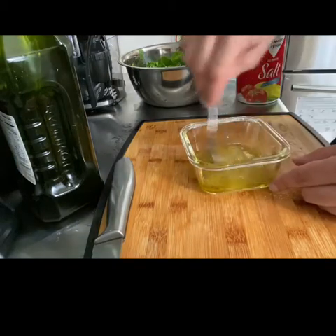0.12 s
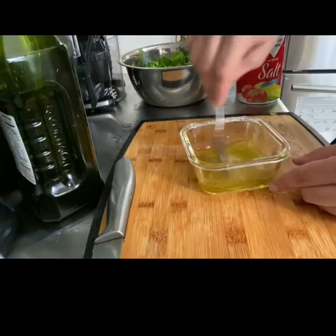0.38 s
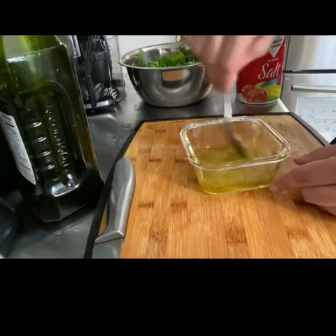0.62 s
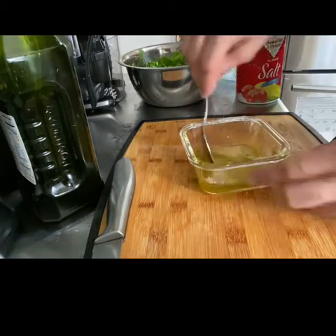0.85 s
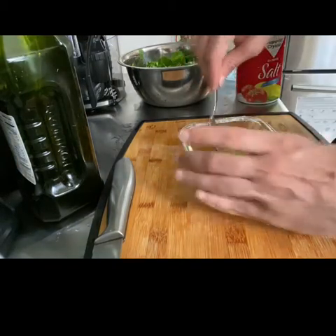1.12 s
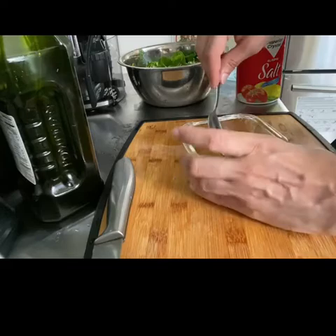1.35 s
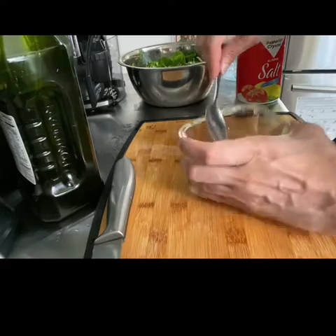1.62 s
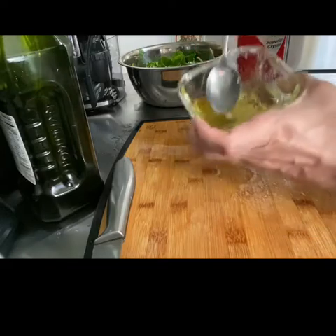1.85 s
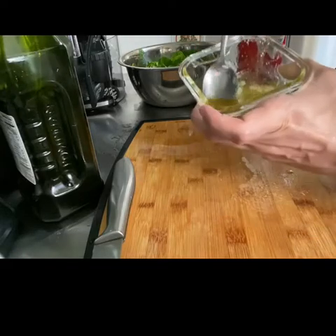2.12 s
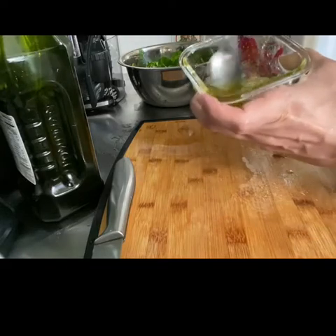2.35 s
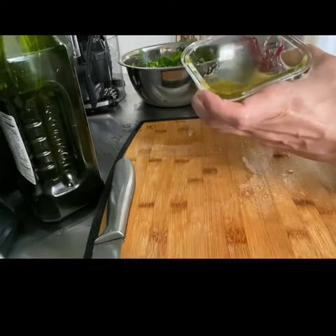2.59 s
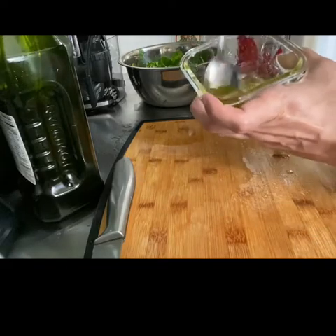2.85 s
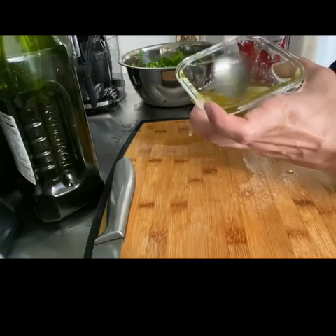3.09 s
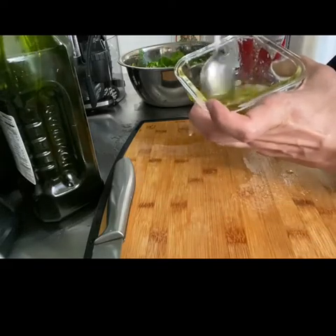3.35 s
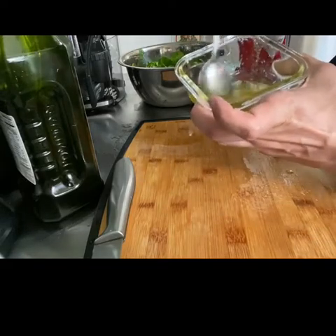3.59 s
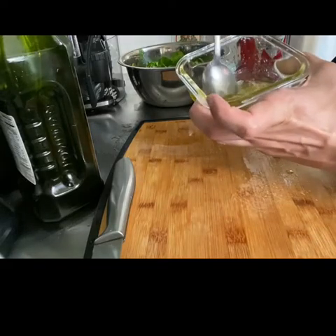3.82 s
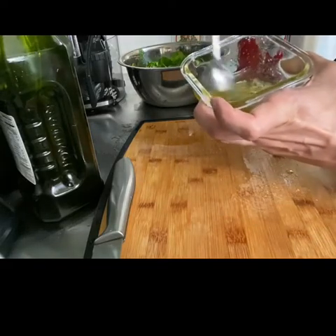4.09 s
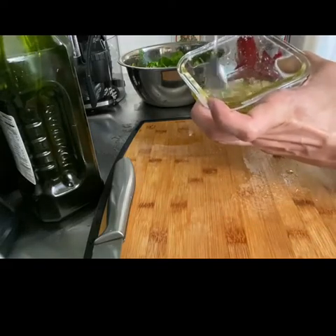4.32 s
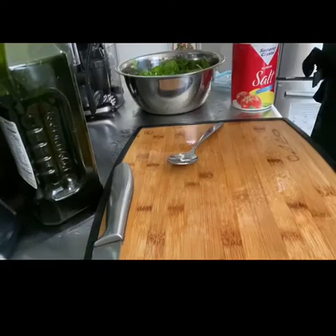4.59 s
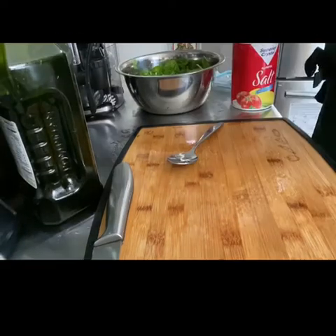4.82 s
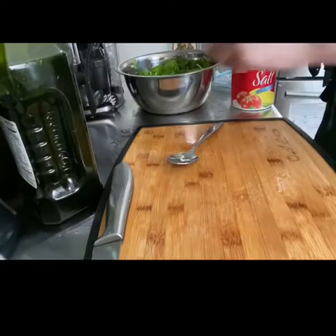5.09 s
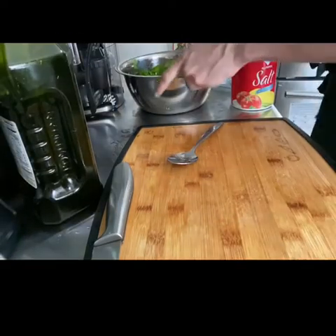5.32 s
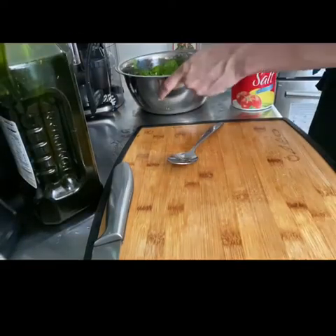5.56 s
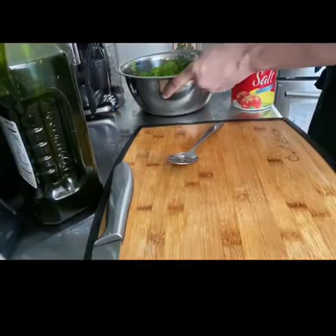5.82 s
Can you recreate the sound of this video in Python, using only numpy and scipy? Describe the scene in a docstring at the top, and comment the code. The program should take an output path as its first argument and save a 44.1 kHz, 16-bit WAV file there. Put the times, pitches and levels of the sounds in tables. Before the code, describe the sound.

Bright ringing spoon-on-glass clinks, wet stirring and sparse sharper knocks over a low kitchen drone, ending with soft thumps on a metal bowl.

```python
"""In a kitchen, a steel spoon stirs oily dressing in a small glass dish; after a dip in level, fingers tap a salad bowl.
Clinks are noise cracks with decaying glass modes; stirring and scraping are friction noise through resonances.
Bubbles are decaying sines of rising pitch, the dragged dish hums as a sine, and the taps are falling sines with clicks.
A hand lifts the dish and damps it. Shaped noise drones behind and is quieter after the dip."""
import sys
import numpy as np
from scipy import signal
from scipy.fft import rfft, irfft, next_fast_len
from scipy.io import wavfile
from scipy.ndimage import uniform_filter1d, map_coordinates

SR = 44100
rng = np.random.default_rng(int(sys.argv[2]) if len(sys.argv) > 2 else 0)


def generate_wav(signal):
    """Clip the signal to [-1, 1] and save it as 16-bit WAV at the path in sys.argv[1]."""
    frames = np.transpose(np.atleast_2d(signal))
    scaled = np.clip(frames, -1, 1) * 32767
    pcm = np.round(scaled).astype(np.int16)
    wavfile.write(sys.argv[1], SR, pcm)


def volts_from_db(level):
    """Convert decibel levels to linear amplitude ratios."""
    exponent = np.asarray(level, float) / 20
    return 10 ** exponent


N = 261954
CHANGE_S = 4.527  # the kitchen turns quieter, at the bottom of the dip
STIR_FROM_S, STIR_TO_S = 2.12, 4.5  # span of the chance touches and chance bubbles

# Louder kitchen spectrum. Each row: frequency in Hz, gain in dB.
DRONE_SPECTRUM = [(40, -7.5), (63, -7), (192, -5), (260, -9), (400, -10.5), (510, -13), (1010, -17.5),
                  (1390, -24.5), (3000, -33), (7900, -42.5), (9000, -42), (12200, -45.5), (14000, -51),
                  (15000, -72)]
# Quieter kitchen spectrum. Each row: frequency in Hz, gain in dB.
QUIET_SPECTRUM = [(43, -5), (87, -4.5), (135, -14), (280, -16), (500, -23), (1600, -30.5), (3500, -44),
                  (6400, -51), (9200, -47.5), (10300, -61.5), (11800, -41.5), (14300, -42.5),
                  (15300, -62.5)]
# Room resonances in the drone. Each row: frequency in Hz, width in Hz, height in dB re the flat base.
ROOM_MODES = [(58.3, 8.2, 13), (100, 4.9, 7), (148, 3, 4), (191.2, 11, 10.5), (235.6, 8.9, 8)]
# Course of the louder kitchen. Each row: time in seconds, level in dB.
DRONE_LEVEL = [(0, -43), (.19, -48.5), (.5, -47.5), (1.4, -45.5), (1.8, -46.5), (3.2, -47), (4.49, -45.8)]
# Course of the quieter kitchen. Each row: time in seconds, level in dB.
QUIET_LEVEL = [(4.6, -56), (5.94, -53)]
# Left-right likeness of the kitchen. Each row: frequency in Hz, correlation from -1 to 1.
LIKENESS = [(60, 0.94), (180, 0.89), (550, 0.06), (1650, 0.14), (4970, 0.38), (15000, -0.35)]
# Band thinned out of the drone, ringing, friction, bubbles and room tail. Each row: frequency in Hz, gain in dB.
GAP = [(9000, -2), (9500, -30), (10900, -30.5), (11300, -3)]
# Strokes of the spoon through the dressing.
# Each row: middle in seconds, length in seconds, then mid-stroke levels in dB: 4.3 kHz ring, 3 kHz ring, swish.
STROKES = [(.06, 0.11, -69.5, -67, -62), (0.189, 0.0371, -40, -58.5, -69), (2.186, 0.12, -62.5, -65, -68),
           (2.31, .1, -64.5, -58.5, -62.5), (2.436, 0.03, -51.5, -74, -62), (2.503, .08, -62, -67, -66),
           (2.651, .1, -61, -74, -61), (2.785, 0.037, -74, -61, -78), (2.908, 0.095, -58.5, -69, -59),
           (3.198, 0.078, -56.5, -74, -60), (3.45, .1, -62.5, -73, -66), (3.724, .1, -58.5, -63, -59),
           (3.813, 0.07, -70, -70, -61), (3.926, .14, -66, -71, -63), (4.16, .14, -56, -60, -55),
           (4.404, 0.029, -80, -57, -84), (4.497, 0.029, -51.5, -81, -85)]
# Spectrum of the wet swish. Each row: frequency in Hz, gain in dB.
SWISH_SPECTRUM = [(900, -29), (1500, -4.5), (3000, -7.5), (6100, -4.5), (8500, -1), (12000, -6),
                  (15000, -21)]
# Bubbles in the dressing.
# Each row: start in seconds, level in dB, starting pitch in Hz, t60 in seconds, pitch rise as a share.
BUBBLES = [(0.092, -20, 960, 0.063, 0.23), (0.109, -35, 1363, 0.073, 0.054), (.31, -47, 1351, .1, 0.035),
           (.345, -44.5, 1350, 0.11, 0.038), (2.275, -47.5, 1200, 0.093, .05),
           (2.628, -47, 1420, 0.049, 0.049), (3.358, -49, 1232, 0.028, .05),
           (4.291, -31.5, 1250, 0.036, .03), (4.4, -38.5, 1030, 0.094, 0.31),
           (4.413, -32.5, 1255, 0.055, 0.048)]
# Spoon on glass. Each row: start in seconds, blow level in dB, treble tilt in dB,
# ring in dB re the blow, ring tilt near 3 kHz in dB.
CLINKS = [(0.0922, -33, -5.5, -39.5, 5), (0.192, -5, -2, -34, -8.5), (0.2158, -28, -6.5, -34.5, -7),
          (0.5145, -8, -4.5, -34, -11), (0.5494, -33, -1, -26.5, -5.5), (0.8696, -6, 1.5, -32, -4),
          (1.0712, -9.5, 0.5, -36, -13.5), (2.0547, -22.5, -3.5, -37, 5.5), (2.1871, -52, -15, -24, -2.5),
          (2.2403, -54, -2.5, -30, 9), (2.319, -55, -2, -32, 6.5), (2.96, -49, -8, -34, 10.5),
          (2.2707, -47.5, -7, -37, 2), (2.3979, -49.5, -7, -32.5, -1), (2.5569, -45.5, 1.5, -36, 18),
          (2.6785, -54.5, 8, -43, -4.5), (2.9181, -45, -1, -51, -3), (3.0628, -45.5, -8.5, -35.5, 8),
          (3.18, -51, -1, -27, -10), (3.3164, -52.5, 0, -40, 8), (3.5199, -43, -2.5, -38.5, 8),
          (3.5886, -13, 4, -44, 10), (3.6283, -21.5, -3.5, -31, 2.5), (3.8099, -48, -4, -37.5, 1.5),
          (4.0103, -40, 3, -40, 17), (4.0413, -10, 2.1, -44.5, 11), (4.1874, -48.5, -11, -26, -5),
          (4.2958, -32, 0, -36.5, 17.5)]
# Firmness of the hand on the dish. Each row: time in seconds, grip from 0 to 1.
GRIP = [(0, 0.15), (.8, 0.12), (1.0, 0.77), (1.07, 0.35), (1.6, 0.8), (6, 0.58)]
# Higher modes of dish and spoon.
# Each row: frequency in Hz, relative level in dB, t60 in seconds without grip, blurred power share from 0 to 1.
GLASS_MODES = [(1340, -14, .08, .3), (1750, -12, .06, .3), (2780, -14, .1, .5), (3020, -8, .14, .5),
               (3115, -8, .2, .4), (3790, -13, .2, .5), (4075, -7, .5, .6), (4200, -1, .62, .55),
               (4255, -4, .62, .7), (4420, -6, .55, .7), (4545, -12, .3, .7), (5200, -14, .13, .6),
               (5900, -8, .5, .8), (6013, -1, .5, .65), (6490, -13, .2, .6), (6850, -12, .3, .5),
               (7580, -2, .6, .15), (12150, -18, .2, .5), (13300, -16, .15, .5), (14050, -16, .08, .5)]
# Spectrum of the crack before the tilt of each blow. Each row: frequency in Hz, gain in dB.
CRACK_SPECTRUM = [(300, -27.5), (700, -22.5), (1800, -13.5), (2500, -20), (4200, -15.5), (6000, -9),
                  (8000, -20), (10300, -18), (12800, -17.5), (14500, -33.5), (16500, -54)]
# Lowest wall mode after hard blows. Each row: start in seconds, quick level in dB, quick t60 in seconds,
# quick pitch above its twin in Hz, twin pitch in Hz, twin level in dB, twin t60 in seconds.
WALL_MODE = [(.192, -2, .115, .65, 2385, -19, .6), (.515, -.7, .184, 2.75, 2385, -13.3, .56),
             (.871, -3.8, .147, 15.6, 2385, -16.7, .28), (1.072, -11.5, .1, -20, 2475, -35, .46),
             (3.589, -23, .09, 48, 2345, -33, .33), (4.042, -21.5, .12, 12.3, 2352, -31, .45)]
# Hum of the dish dragged on the board. Each row: time in seconds, pitch in Hz, rms level in dB.
SLIDE = [(1.4, 146, -55), (1.45, 148.5, -46), (1.562, 147.5, -47.5), (1.64, 145, -62)]
# Dry slips up the wall. Each row: time of the peak in seconds, peak level in dB.
SLIPS = [(1.637, -53), (1.697, -34)]
# Spectrum of dry friction. Each row: frequency in Hz, gain in dB.
RUB_SPECTRUM = [(530, -49.5), (900, -20), (1230, 4), (2390, -0.5), (3230, -6.5), (4630, -11.5), (5550, -5),
                (7770, -14.5), (8350, -25), (9420, -72), (11700, -6.5), (14000, -27), (16000, -99)]
# Glass resonances under friction. Each row: frequency in Hz, width in Hz, height in dB re the flat base.
RUBBED_MODES = [(2420, 69, 16), (4670, 330, 17.5), (6100, 150, 5), (8060, 310, 18), (12350, 200, 9.5),
                (13500, 200, 7)]
# Fingers on the bowl. Each row: start in seconds, overall gain in dB, click in dB re that gain, final pitch in Hz.
TAPS = [(4.814, -61, 2, 108.5), (5.442, -37, -7, 105), (5.609, -34.5, -9.5, 102), (5.716, -36, -11, 107.8),
        (5.777, -34.5, -22, 105), (5.888, -30.5, -9.5, 112.2)]
# Tiny dry ticks. Each row: start in seconds, level in dB, pitch in Hz.
TICKS = [(4.9794, -54, 7040), (5.0576, -46, 7660)]
# Decay of the room. Each row: frequency in Hz, t60 in seconds.
ROOM_DECAY = [(300, .3), (2000, 0.16), (6000, 0.25), (9000, 0.047), (13000, 0.067)]
# Phase of near sources. Each row: frequency in Hz, lead of the left port in radians.
PORT_LEAD = [(0, 0.5), (2500, -1), (3360, 2.09), (5170, -2.5), (6290, -6.5), (14100, -11.5), (14800, -11),
             (16400, -24)]
# Gain of the whole mix, with one brief dip. Each row: time in seconds, gain in dB.
FADE = [(0, 1), (4.495, 1.5), (4.527, -23), (4.575, 2), (6, -1)]


def unit(x):
    """Normalization: scaled to rms 1."""
    return x / np.sqrt(np.mean(x ** 2) + 1e-20)


def along(points, hz):
    """Interpolation of (Hz, value) points on a logarithmic frequency axis."""
    f, v = np.transpose(points)
    return np.interp(np.log(hz + 1), np.log(f + 1), v)


def curves(rows):
    """Linear interpolation: a curve for each column, and a gate open inside the table's time."""
    s, *cols = np.transpose(rows)
    t = np.arange(N) / SR
    gate = uniform_filter1d(1. * (t >= s[0]) * (t <= s[-1]), size=40)
    return [np.interp(t, s, c) for c in cols] + [gate]


def wobble(rate):
    """Slow random modulation: a smooth curve with rate knots a second."""
    knots = rng.standard_normal(int(N * rate / SR) + 4)
    return map_coordinates(knots, [np.arange(N) * rate / SR])


def filtered(x, response):
    """Linear filtering: the spectrum times a complex response of frequency."""
    m = next_fast_len(x.shape[-1] + 8192)
    return irfft(rfft(x, m) * response(np.fft.rfftfreq(m, 1 / SR)), m)[..., :x.shape[-1]]


def peaks(modes, hz):
    """Resonance: Lorentzian power peaks standing on a flat base."""
    return np.sqrt(1 + sum(volts_from_db(db) ** 2 / (1 + (2 * (hz - c) / w) ** 2) for c, w, db in modes))


def add(track, s, sound):
    """Superposition: mix a sound in at a time in seconds."""
    part = track[round(s * SR):][:len(sound)]
    part += sound[:len(part)]


def rush(gain, patchy_db):
    """Partly coherent noise with random patches in time and frequency; the mid's 40-1200 Hz sets the scale."""
    z = signal.stft(rng.standard_normal((2, N)), nperseg=2048)[2]
    field = uniform_filter1d(rng.standard_normal(z.shape[1:]), size=2, axis=0)
    field = uniform_filter1d(field, size=5, axis=1)
    pair = signal.istft(z * volts_from_db(patchy_db * unit(field)), nperseg=2048)[1][:, :N]

    def mid_side_gain(hz):
        """Correlation as the cosine of an angle, split between mid and side."""
        half_angle = np.arccos(np.clip(along(LIKENESS, hz), -1, 1)) / 2
        return gain(hz) * [np.cos(half_angle), np.sin(half_angle)]

    mid, side = filtered(pair, mid_side_gain)
    body = filtered(mid, lambda hz: (hz > 40) * (hz < 1200))
    return np.array([mid + side, mid - side]) / np.std(body)


def kitchen():
    """Room resonance: far machines drone in the room's modes; later only a softer rumble and hiss."""
    drone = rush(lambda hz: volts_from_db(along(DRONE_SPECTRUM, hz) + along(GAP, hz)) * peaks(ROOM_MODES, hz), patchy_db=3.0)
    quiet = rush(lambda hz: volts_from_db(along(QUIET_SPECTRUM, hz)), patchy_db=1.5)
    drone = volts_from_db(curves(DRONE_LEVEL)[0]) * drone
    quiet = volts_from_db(curves(QUIET_LEVEL)[0]) * quiet
    early = np.arange(N) < CHANGE_S * SR
    return volts_from_db(0.44 * wobble(3)) * np.where(early, drone, quiet)


def stirring():
    """Wet friction: a grainy swish, and glass resonances that flicker on their own."""
    def flicker(rate):
        return volts_from_db(2.5 * wobble(rate)) * rng.standard_normal(N)

    def band(center_hz, width_hz):
        return unit(filtered(flicker(60), lambda hz: 1 / (1 + (2 * (hz - center_hz) / width_hz) ** 2)))

    # on average 400 grains a second, of widely spread strength
    grains = (rng.random(N) < 400 / SR) * volts_from_db(5 * rng.standard_normal(N))
    swish = unit(filtered(flicker(44) + 9 * grains, lambda hz: volts_from_db(along(SWISH_SPECTRUM, hz))))
    swish = swish + 0.223 * band(6350, 280)
    upper, lower = band(4320, 360), band(3060, 300)
    t = np.arange(N) / SR
    levels = np.zeros((3, N))
    for s, length, *db in STROKES:
        # 13 dB down at both ends of the stroke, and on falling beyond
        levels += volts_from_db(np.array(db)[:, None] - 13 * np.abs(2 * (t - s) / length))
    return np.sum(levels * [upper, lower, swish], axis=0)


def chance_bubbles():
    """Random nucleation: rows like BUBBLES for tiny ones while the lifted dish is stirred."""
    count = 90
    when = rng.uniform(STIR_FROM_S, STIR_TO_S, count)
    size, tune = rng.standard_normal((2, count))
    # levels spread by 4 dB, pitches by 0.6 octave
    return [(s, -59 + 4 * a, 2592 * 2 ** (0.6 * b), .03, .04) for s, a, b in zip(when, size, tune)]


def bubbles():
    """Bubble resonance: a damped sine with a soft start and a rising pitch."""
    out, t = np.zeros(N), np.arange(SR // 5) / SR
    for s, db, hz, t60, rise in BUBBLES + chance_bubbles():
        pitch = hz * (1 + rise * (1 - np.exp(-t / 0.02)))
        envelope = volts_from_db(db - 60 * t / t60) * (1 - np.exp(-t / 0.003))
        add(out, s, envelope * np.sin(2 * np.pi * np.cumsum(pitch) / SR))
    return out


def grip_at(s):
    """Damping by the hand: its firmness from 0 to 1 at a time in seconds."""
    return np.clip(np.interp(s, *np.transpose(GRIP)), 0, 1)


def shimmer(count, t, rate):
    """Random modulation: one complex wobble of rms 1 for each mode, rate knots a second."""
    knots = rng.standard_normal((2, count, int(t[-1] * rate) + 2))
    k, part = (t * rate).astype(int), t * rate % 1
    smooth = knots[..., k] * (1 - part) + knots[..., k + 1] * part
    return unit(smooth[0]) / np.sqrt(2) + 1j * unit(smooth[1]) / np.sqrt(2)


def touches():
    """Chance contact: rows like CLINKS for faint touches while the lifted dish is stirred."""
    count = 14
    when = rng.uniform(STIR_FROM_S, STIR_TO_S, count)
    size, third = rng.standard_normal((2, count))
    return [(s, -55 + 2.5 * a, -9, -27, 6 * b) for s, a, b in zip(when, size, third)]


def clinks():
    """Impact excitation: a crack, a hiss of dense small modes, clear modes, and the board's thud under a standing dish."""
    sharp, ringing, t = np.zeros(N), np.zeros(N), np.arange(SR // 2) / SR
    mode_hz, mode_db, t60, blur = np.transpose(GLASS_MODES)[:, :, None]
    waves = np.exp(2j * np.pi * mode_hz * t)
    for s, db, treble_db, ring_db, third_db in CLINKS + touches():
        grip = grip_at(s)
        knock_db = 2.6 - 6 * grip  # a firm hand weakens the low knock
        top_db = -1.1 + 1.5 * min(treble_db, 2)  # the top swings more than the treble
        tilt_points = [(1000, knock_db - 2.5), (1800, knock_db), (2400, 0.01), (3050, third_db), (3900, 0),
                       (4600, 0), (6500, treble_db - 4.0), (8500, treble_db + 2.5), (11500, top_db)]
        tilt = lambda hz: volts_from_db(along(tilt_points, hz))

        noise = unit(filtered(rng.standard_normal(len(t)), lambda hz: tilt(hz) * volts_from_db(along(CRACK_SPECTRUM, hz))))
        crack = volts_from_db(-60 * t / (.011 + .012 * grip)) * (1 - np.exp(-t / .0007)) * noise
        hiss = filtered(noise, lambda hz: volts_from_db(along([(5000, -0.5), (8000, -3.0), (12000, -3)], hz)))
        hiss_level = volts_from_db(-33.0 + 18 * grip - 60 * t / 0.3)

        life = t60 * (1 - .9 * grip)
        # a fast first drop while the spoon still touches, then free ringing
        fall = volts_from_db(-60 * t / life) * (1 + 11.0 * volts_from_db(-60 * t / 0.069))
        # the sloshing dressing blurs each mode
        blurring = np.sqrt(1 - blur) + np.sqrt(blur) * shimmer(len(GLASS_MODES), t, rate=130)
        cluster = np.imag(waves * blurring)
        strength = tilt(mode_hz) * volts_from_db(mode_db + 0.83 * rng.standard_normal(mode_hz.shape))
        ring = np.sum(strength * fall * cluster, axis=0)

        thud = (1 - grip) ** 2 * volts_from_db(-25.5 - 60 * t / 0.077) * np.sin(2 * np.pi * 480 * t)
        add(sharp, s, volts_from_db(db) * (volts_from_db(-5.5 + 7.7 * grip) * crack + thud))
        add(ringing, s, volts_from_db(db) * (hiss_level * hiss + volts_from_db(ring_db) * ring))
    return sharp, ringing


def singing():
    """Mode splitting: a quick mode and its lasting twin in opposite phase; a firm hand spreads both."""
    out = np.zeros(N)
    stops = [row[0] for row in WALL_MODE[1:]] + [CHANGE_S]
    for (s, db, t60, split_hz, hz, twin_db, twin_t60), stop in zip(WALL_MODE, stops):
        t = np.arange(min(round((stop - s) * SR), SR // 2)) / SR
        quick = volts_from_db(db - 60 * t / t60) * np.exp(2j * np.pi * split_hz * t)
        twin = volts_from_db(twin_db - 60 * t / twin_t60)
        blur = np.clip(1.5 * grip_at(s) ** 1.8, 0, 1)
        spread = np.sqrt(1 - blur) + np.sqrt(blur) * shimmer(1, t, rate=220)[0]
        # the spoon wading towards its next blow stills the ring by 9 dB over 0.1 s
        mute = volts_from_db(-9 * np.clip(1 - (stop - s - t) / 0.1, 0, 1))
        onset = 1 - np.exp(-t / 0.0011)
        add(out, s, mute * onset * np.imag((quick - twin) * spread * np.exp(2j * np.pi * hz * t)))
    return out


def sliding():
    """Friction hum: a sine of gliding pitch as the dish is dragged on the board."""
    hz, db, gate = curves(SLIDE)
    return gate * volts_from_db(db) * np.sqrt(2) * np.sin(2 * np.pi * np.cumsum(hz) / SR)


def scraping():
    """Dry friction: gritty noise through the dish's resonances."""
    grit = volts_from_db(3.4 * wobble(68.71) + 2.5 * wobble(400)) * rng.standard_normal(N)
    t = np.arange(N) / SR
    rise_db_s, fall_db_s = 425, 400
    slips = sum(volts_from_db(db - np.maximum(rise_db_s * (s - t), fall_db_s * (t - s))) for s, db in SLIPS)
    return slips * unit(filtered(grit, lambda hz: volts_from_db(along(RUB_SPECTRUM, hz)) * peaks(RUBBED_MODES, hz)))


def tapping():
    """Dispersion: dull thumps sweep downward, since bending waves carry the highs first; two ticks besides."""
    out, t = np.zeros(N), np.arange(SR // 5) / SR
    for s, db, click_db, final_hz in TAPS:
        pitch = final_hz + 420 * np.exp(-t / 0.0043)
        thump = (1 - np.exp(-t / 0.0093)) * volts_from_db(5.5 - 60 * t / .1) * np.sin(2 * np.pi * np.cumsum(pitch) / SR)
        noise = unit(filtered(rng.standard_normal(len(t)), lambda hz: 1 / (1 + (hz / 900) ** 4)))
        click = volts_from_db(click_db - 60 * t / 0.018) * (1 - np.exp(-(t / 0.00056) ** 2)) * noise
        add(out, s, volts_from_db(db) * (thump + click))
    for s, db, hz in TICKS:
        add(out, s, volts_from_db(db - 60 * t / 0.0023) * np.sin(2 * np.pi * hz * t))
    return out


def room(x):
    """Diffuse reverberation: a fresh tail every fifth of a second; each frequency dies at its own speed."""
    out, step = np.zeros((2, N + SR)), SR // 5
    delay = 200  # samples
    for start in range(0, N, step):
        hz, t, z = signal.stft(rng.standard_normal((2, SR // 2)), SR, nperseg=256)
        decay = volts_from_db(-60 * t / along(ROOM_DECAY, hz)[:, None])
        tail = signal.istft(z * decay, SR, nperseg=256)[1]
        wet = signal.fftconvolve(x[None, start:start + step], tail / np.linalg.norm(tail[0]), axes=1)
        out[:, start + delay:][:, :wet.shape[1]] += wet[:, :N + SR - start - delay]
    return out[:, :N]


def ports(x):
    """Interaural-like phase: two microphone ports hear a near source with a phase offset and 0.6 dB apart."""
    sign = np.array([[1], [-1]])
    return filtered(x, lambda hz: np.exp(.5j * along(PORT_LEAD, hz) * sign)) * volts_from_db([[.3], [-.3]])


def scene():
    """Superposition of the near dish, its room, the bowl and the kitchen."""
    background = kitchen()
    friction = stirring() + scraping()
    sharp, ringing = clinks()
    soft = ringing + friction + bubbles()
    sing = singing()
    wet = room(volts_from_db(-14) * (sharp + soft) + volts_from_db(-27) * sing)
    gapped = filtered(ports(soft) + wet, lambda hz: volts_from_db(along(GAP, hz)))
    near = ports(sharp + sing) + sliding() + tapping()
    return volts_from_db(curves(FADE)[0]) * (near + gapped + background)


def low_pass(x):
    """Removes everything above the highest recorded frequency."""
    return signal.sosfilt(signal.butter(12, 16810, fs=SR, output="sos"), x)


def record(dry):
    """Microphone response: the deep bass is dropped and the highest peaks are rounded off by soft saturation."""
    x = filtered(dry, lambda hz: 1 / np.sqrt(1 + (46 / (hz + 1)) ** 12))
    x = x / (1 + np.abs(x / .95) ** 6) ** (1 / 6)
    return low_pass(x)


dry = scene()
out = record(dry)
generate_wav(out)
```